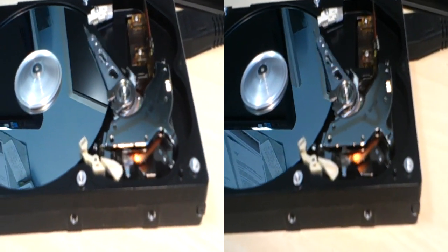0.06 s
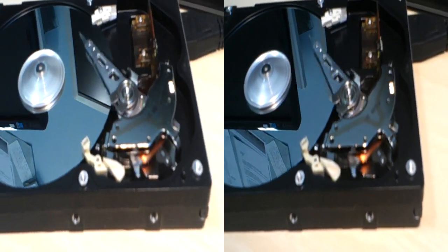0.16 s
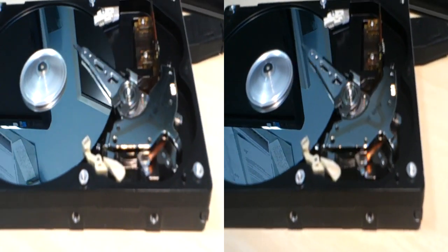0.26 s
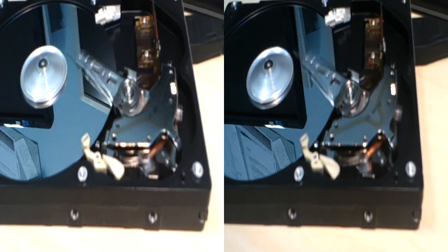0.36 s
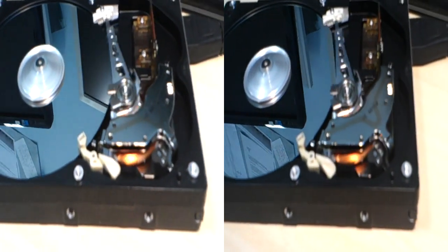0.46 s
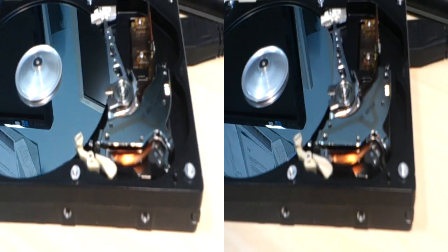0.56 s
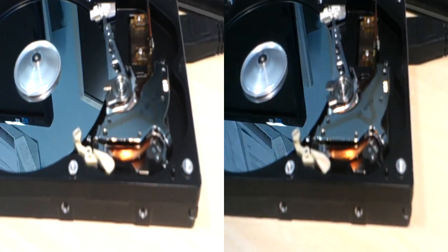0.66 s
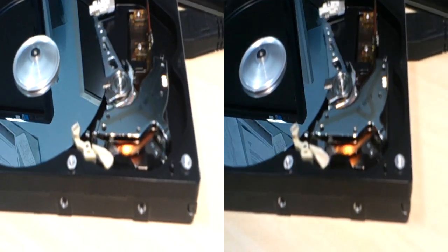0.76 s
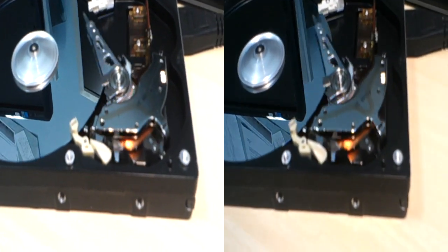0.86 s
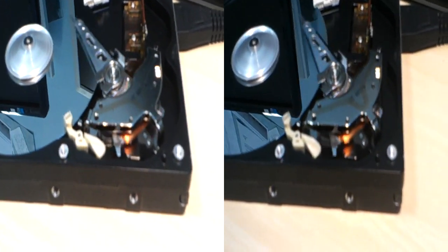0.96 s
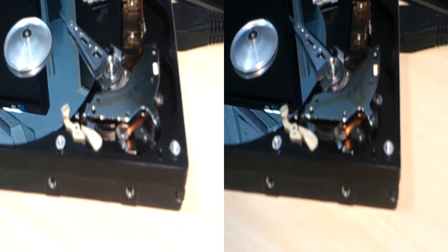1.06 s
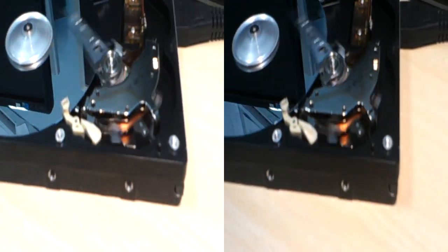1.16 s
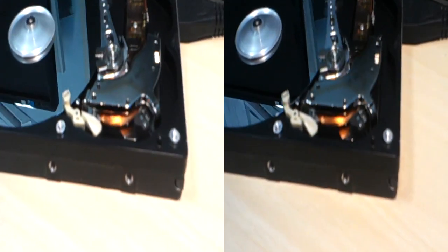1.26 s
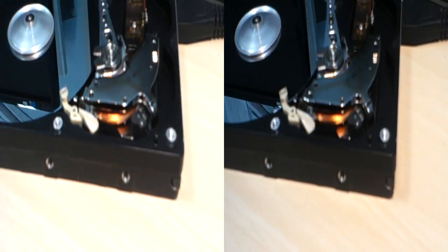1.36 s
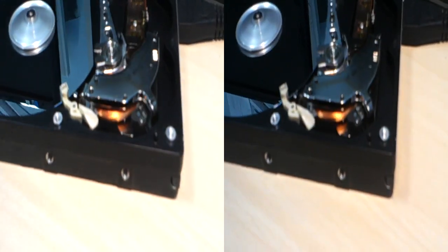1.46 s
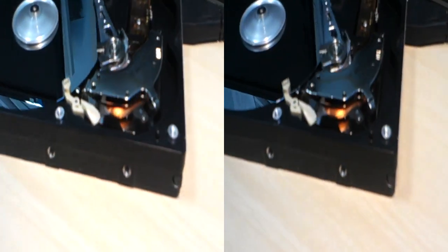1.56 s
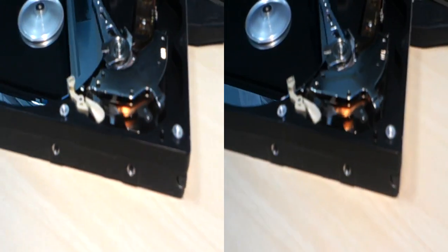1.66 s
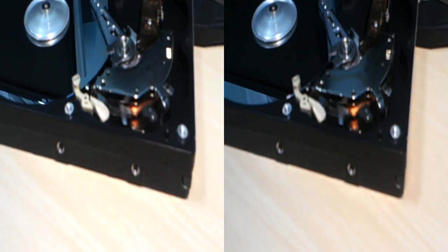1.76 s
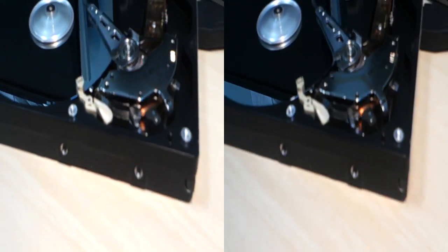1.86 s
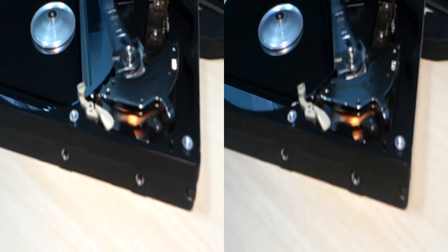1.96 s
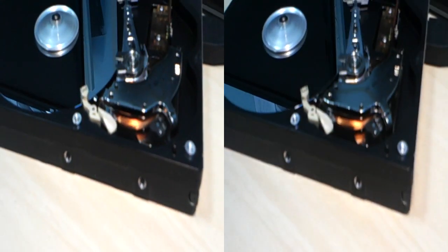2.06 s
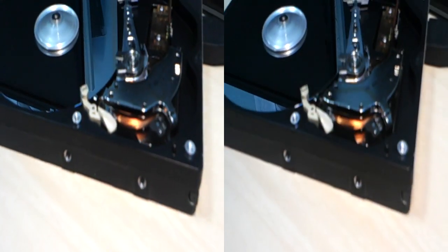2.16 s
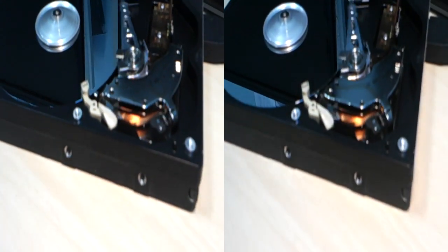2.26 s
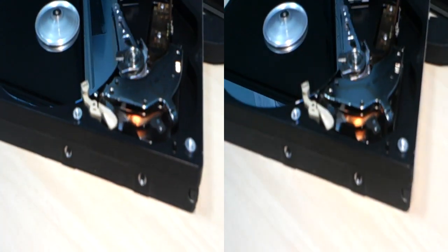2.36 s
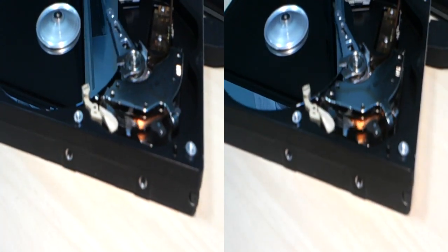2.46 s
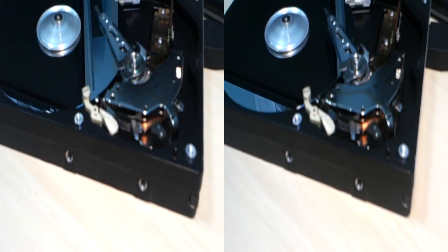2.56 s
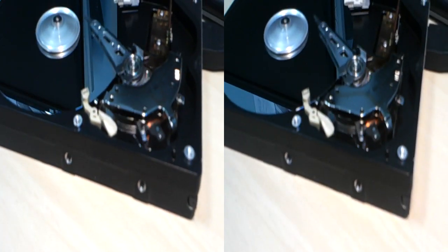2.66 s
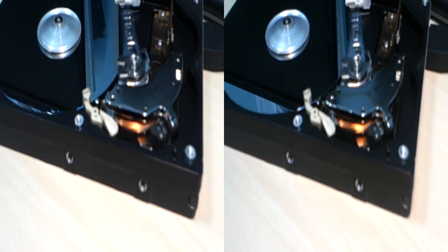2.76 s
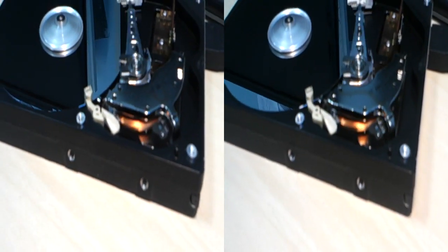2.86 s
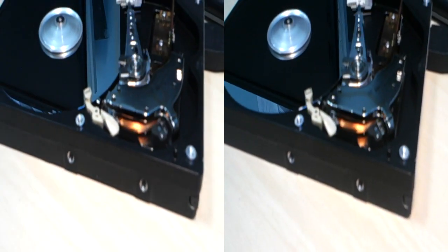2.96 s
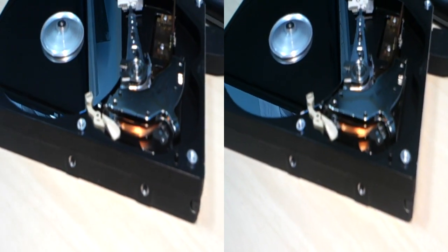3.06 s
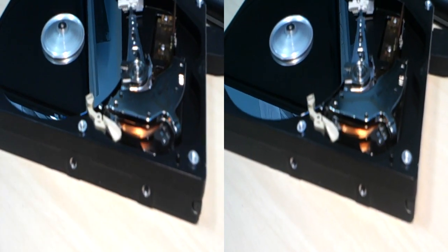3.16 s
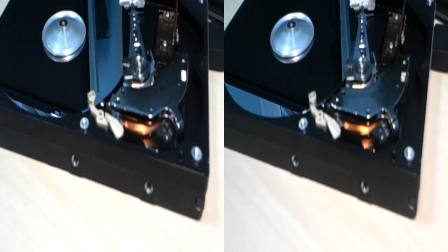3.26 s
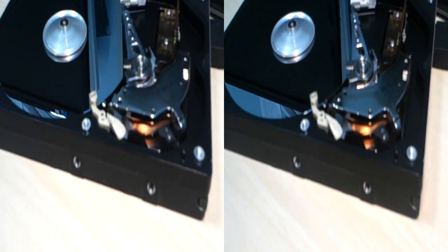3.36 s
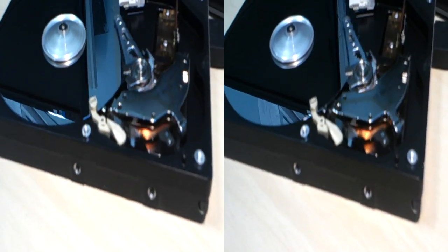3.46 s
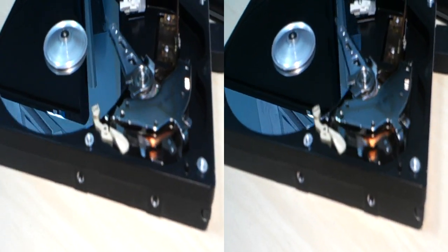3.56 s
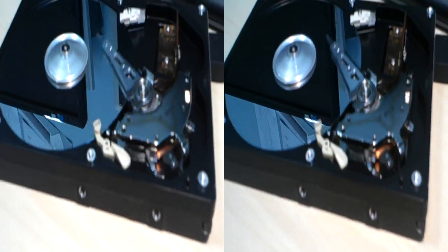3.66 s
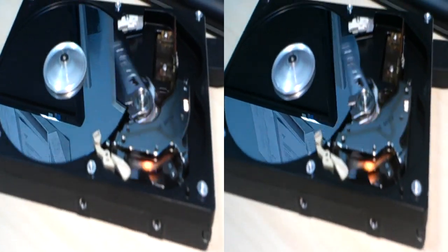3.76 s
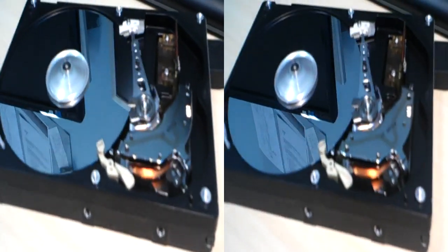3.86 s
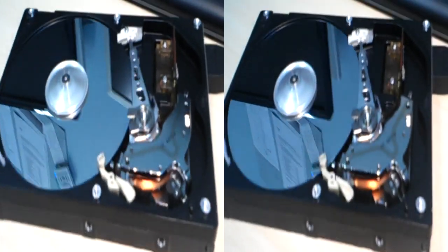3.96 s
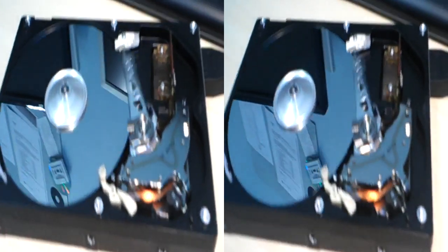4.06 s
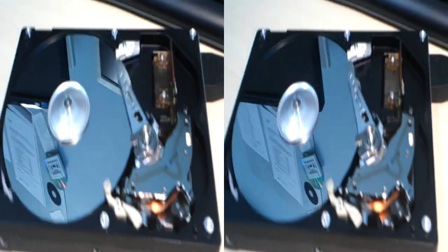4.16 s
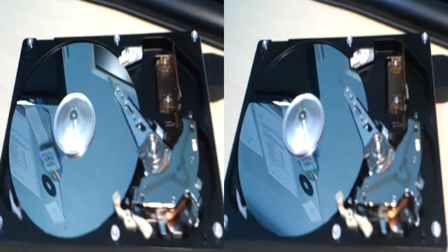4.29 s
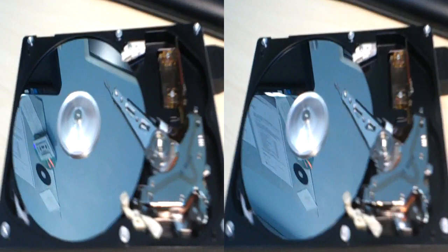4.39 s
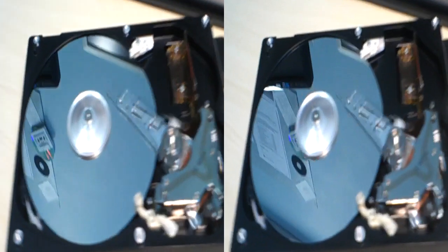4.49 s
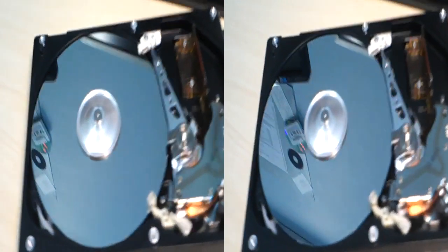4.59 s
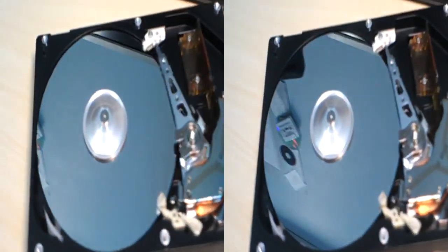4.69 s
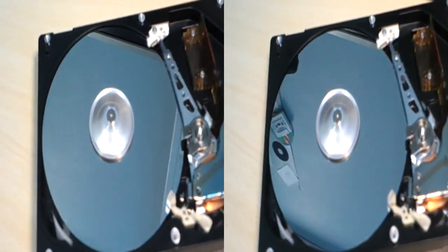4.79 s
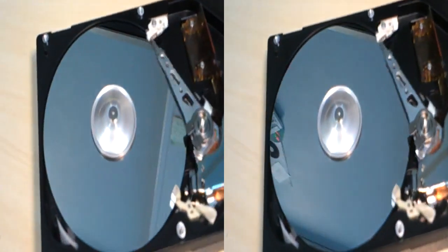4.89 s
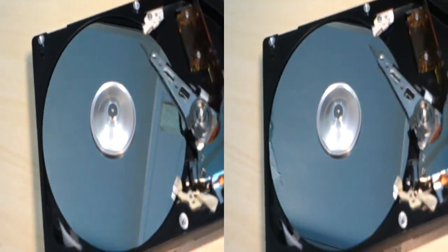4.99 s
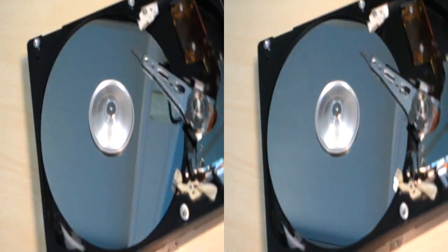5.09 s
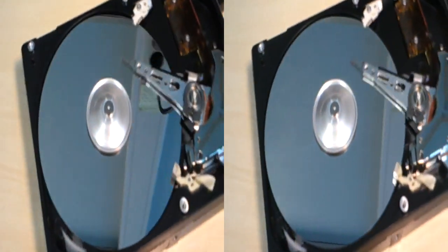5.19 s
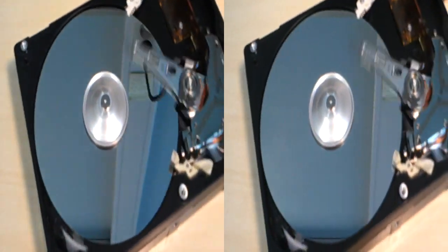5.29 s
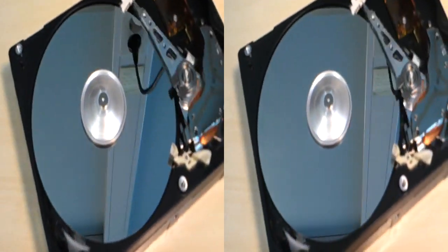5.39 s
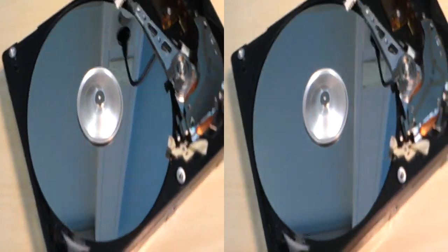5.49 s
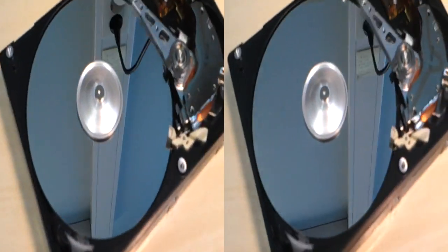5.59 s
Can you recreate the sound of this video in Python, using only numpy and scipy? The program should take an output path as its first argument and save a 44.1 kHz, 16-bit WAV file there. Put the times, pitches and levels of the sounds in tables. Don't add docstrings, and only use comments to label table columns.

```python
import sys
import numpy as np
from scipy import signal
from scipy.io import wavfile
from scipy.ndimage import uniform_filter1d

SR = 44100
rng = np.random.default_rng(int(sys.argv[2]) if len(sys.argv) > 2 else 0)


def voltage_ratio(level):
    return 10 ** (np.asarray(level, float) / 20)


def output_pcm(signal):
    pcm = np.clip(np.atleast_2d(signal).T, -1, 1) * 32767
    wavfile.write(sys.argv[1], SR, np.round(pcm).astype(np.int16))


N = 248283
T = np.arange(N) / SR

# base, frame, arm, arm tip, flexure [f/Hz]
PARTS_HZ = [1600, 2760, 3430, 3750, 6300]
FLAT_DB = np.zeros(len(PARTS_HZ))
# [inner knock t/s, lift-off lead/s (0 = bounce off the last slam), knock level/dB, slam level/dB,
# base ring in the slam/dB]
CYCLES = [
    (0.1001, .071, 1, -1.5, -3),
    (0.878, .085, 1.5, 0.5, 3),
    (1.6519, .0786, 0.5, -1, -8),
    (2.4203, .076, 0, -1, -13),
    (3.1942, .080, -1.5, -1, -18),
    (3.4582, 0, 0.5, -1, -14),
    (4.2272, .0756, 0.5, -3, -4.5),
    (5.0012, .0804, 2, -4, 5.5),
]
# [t/s, retreat 0-1, platter in view 0-1, turned away from the arm tip 0-1]
HAND = [(0, 0, 1, 0.53), (.35, 0.11, 1, 0.57), (.8, 0, 0.86, 0.25), (1.15, 0.09, 0.77, 0.46),
        (1.6, 0.28, 0.36, 0.36), (1.93, .3, .03, 0.25), (2.4, .48, .35, 0.22), (3.0, 0.4, 0.46, 0.27),
        (3.5, .45, 0.67, 0.01), (4.15, 0.47, 0.04, 0.27), (4.3, 0.63, .15, 0.7), (4.6, 0.5, 0.4, 0.53),
        (4.97, 0.63, 1, 1), (5.3, 0.7, 1, 0.83), (5.63, 0.83, 0.7, 0.5)]
BRAKE_LEAD_S = .018


def evened(x):
    return x / np.sqrt(np.mean(abs(x) ** 2) + 1e-20)


def add(mix, s, sound):
    cut = max(-round(s * SR), 0)
    part = mix[max(round(s * SR), 0):][:len(sound) - cut]
    part += sound[cut:][:len(part)]


def waver(count, width_hz):
    keep = np.exp(-np.pi * width_hz / SR)
    z = rng.standard_normal((count + 4000, 2)) @ [1, 1j]
    once = signal.lfilter([1], [1, -keep], z)
    return evened(signal.lfilter([1], [1, -keep], once)[4000:])


def curve(rows):
    s, *columns = np.transpose(rows)
    return [np.interp(T, s, c) for c in columns]


def away(s):
    times, *_, turn = np.transpose(HAND)
    return np.interp(s, times, turn)


def seen(parts_db, away_db, s):
    return np.add(parts_db, away(s) * np.array(away_db))


def placed(rows):
    moves = np.array(curve(HAND))
    return [db + np.array(per_move_db) @ moves for db, *per_move_db in rows]


def tone(hz, db, rough, width_hz, count=N):
    turn = np.exp(2j * np.pi * (np.cumsum(hz * np.ones(count)) / SR + rng.random()))
    return np.sqrt(2) * voltage_ratio(db) * (turn * (1 + rough * waver(count, width_hz))).real


def arm():
    out = np.zeros(N)
    for s, lead_s, knock_db, slam_db, base_db in CYCLES:
        lifts = lead_s > BRAKE_LEAD_S
        slam_s = s + .2432 + (0 if lifts else .0034)
        slam(out, slam_s, slam_db, base_db)
        knock(out, s, knock_db)
        rebound(out, s)
        if lifts:
            lift(out, s - lead_s)
            brake(out, s)
    return out


def slam(out, s, slam_db, base_db):
    # [f/Hz, level/dB, swell/ms, hold/ms, t60/s]
    slam_modes = [(1627, -22, 3.7, 4.7, 0.048), (1810, -31, 8.1, 13, 0.063), (2325, -19.5, 8.3, 9.1, 0.079),
                  (2436, -21.5, 6.5, 6.7, 0.013), (2774, -7, 4.6, 4.8, 0.031),
                  (3410, -11.5, 13.4, 3.7, 0.016), (3480, -11, 15.3, 3.1, 0.026), (3736, 0, 16, 2.1, 0.022),
                  (4514, -12.5, 0.9, 4.9, 0.018), (4686, -15.5, 8.3, 4, 0.028),
                  (5850, -30.5, 1, 3.8, 0.065), (6310, -23.5, 0.93, 6.4, 0.01),
                  (6860, -28.5, 7.6, 6, 0.036), (8490, -29, 2.5, 5.1, 0.021)]
    desk_modes = [(707, -37, 3.7, 3.5, 0.018), (1096, -37, 10, 5.2, 0.16)]
    after_modes = [(2314, -41, 93, 10, 0.097), (2747, -28.5, 49, 12, 0.4), (2870, -35, 18, 10, 0.46),
                   (3420, -35.5, 81, 10, 0.32), (3900, -42.5, 91, 10, 0.29), (3840, -39, 94, 7.9, 0.73),
                   (3640, -39, 130, 7.3, 0.9), (4240, -45, 90, 5, 0.49), (4560, -51, 64, 10, .2),
                   (6330, -45, 44, 10, 0.14)]
    # [centre f/Hz, level/dB, swell/ms, hold/ms, t60/s]
    slam_scrape = [(5180, -23, 1.8, 15.8, 0.04)]
    # face on [level/dB], then change when turned away [level/dB]
    face_db = [-3.5, -3, -0.5, -0.5]
    away_db = [1.7, 3.5, -14, 6.2]
    parts_db = [base_db, *(slam_db + seen(face_db, away_db, s))]
    add(out, s, blow(slam_modes, parts_db, rough=.28, width_hz=780) + scrape(slam_scrape, parts_db[-1]))
    add(out, s, blow(desk_modes, FLAT_DB, rough=0.39, width_hz=15))
    add(out, s, blow(after_modes, .6 * np.array(parts_db), rough=.82, width_hz=85, count=16000))


def knock(out, s, knock_db):
    # [f/Hz, level/dB, swell/ms, hold/ms, t60/s]
    knock_modes = [(966, -24, 6.1, 0.93, 0.1), (777, -30.5, 10.6, 1.7, 0.034),
                   (1643, -18.5, 1.1, 1.2, 0.08), (2350, -12.5, 0.27, 0.79, 0.076),
                   (3020, -13, 0.66, 1.3, 0.018), (3582, -8.5, 0.78, 1.7, 0.0079),
                   (3767, -8, 5.1, 0.27, 0.031), (4574, -10, 0.94, 0.71, 0.021),
                   (5670, -52, 0.78, 1, 0.028), (6200, -20.5, 2.3, 1.4, 0.035), (6480, -19, 1.8, 1, 0.035),
                   (8940, -18.5, 0.21, 0.34, 0.035), (10200, -47, .6, .6, .01),
                   (10930, -24, 0.35, .6, 0.011)]
    # [centre f/Hz, level/dB, swell/ms, hold/ms, t60/s]
    knock_scrape = [(5980, -11.5, 0.85, 1, 0.015)]
    # face on [level/dB], then change when turned away [level/dB]
    face_db = [-8, -9.5, -6.5, 1.8, -7]
    away_db = [-2.7, -3, 10, -19, -3.3]
    parts_db = knock_db + seen(face_db, away_db, s)
    ring = blow(knock_modes, parts_db, rough=.24, width_hz=1900)
    add(out, s - .001, ring + scrape(knock_scrape, parts_db[-1]))


def lift(out, s):
    # [f/Hz, level/dB, swell/ms, hold/ms, t60/s]
    lift_modes = [(2410, -14, 2, 2, 0.033), (2744, -10, 1.4, 2.4, 0.081), (3046, -7.5, 4.5, 2.1, 0.028),
                  (4060, 1, 2.4, 0.76, 0.018), (4760, -11, 1.8, 1.5, 0.015), (6150, -19, 2.8, 4.1, 0.07),
                  (6820, -11.5, 1.5, 2, 0.024), (8560, -17, 1.8, 0.72, 0.014)]
    # [centre f/Hz, level/dB, swell/ms, hold/ms, t60/s]
    lift_scrape = [(4640, -25, 0.98, 3.6, 0.073)]
    # face on [level/dB], then change when turned away [level/dB]
    face_db = [-19.5, -19.5, -20.5, -13, -21]
    away_db = [6, -.4, -2, -19.5, 9]
    parts_db = seen(face_db, away_db, s)
    ring = blow(lift_modes, parts_db, rough=.24, width_hz=890)
    add(out, s - .0015, ring + scrape(lift_scrape, parts_db[-1]))


def brake(out, knock_s):
    # [f/Hz, level/dB, swell/ms, hold/ms, t60/s]
    brake_modes = [(3770, -16, 5.5, 6, 0.0097), (4330, -31, 1, 3.5, 0.033), (5700, -24, 1, 2.7, 0.035),
                   (6760, -17, 1, 3.6, 0.057), (8300, -17, 1, 2.7, 0.046)]
    parts_db = [0, 0, 0, 0, -6 + 6 * away(knock_s)]
    jolt = blow(brake_modes, parts_db, rough=0.34, width_hz=270)
    add(out, knock_s - BRAKE_LEAD_S - .001, voltage_ratio(-9.5 - 6 * away(knock_s)) * jolt)


def rebound(out, knock_s):
    # [f/Hz, level/dB, swell/ms, hold/ms, t60/s]
    rebound_modes = [(2810, -10.5, 1.6, 1.1, 0.053), (3790, -6, 1.3, 1.9, 0.024),
                     (4800, -12, 1, 1.4, 0.012)]
    tap = blow(rebound_modes, FLAT_DB, rough=0.31, width_hz=270)
    add(out, knock_s + .1018 - .001, voltage_ratio(-18 - 8.5 * away(knock_s)) * tap)


def blow(modes, parts_db, rough, width_hz, count=4000):
    t, out = np.arange(count) / SR, np.zeros(count)
    steady = np.sqrt(1 - rough ** 2)
    for hz, db, swell_ms, hold_ms, t60_s in modes:
        rise = np.sin(np.pi / 2 * np.minimum(t * 1000 / swell_ms, 1)) ** 2
        fall_db = -60 * np.maximum(t - (swell_ms + hold_ms) / 1000, 0) / t60_s
        turn = np.exp(2j * np.pi * (hz * t + rng.random()))
        turn = turn * (steady + rough * waver(count, width_hz))
        out += voltage_ratio(db + np.interp(hz, PARTS_HZ, parts_db) + fall_db) * rise * turn.real
    return out


def scrape(band, db):
    edges_hz = [900, 11500]
    rasp = blow(band, [db] * len(PARTS_HZ), rough=1, width_hz=6800)
    return signal.sosfilt(signal.butter(3, edges_hz, "band", fs=SR, output="sos"), rasp)


def room(x):
    t60_s, gap_s, spacing = 0.29, 0.037, 22
    taps = np.zeros(SR // 2)
    at = np.arange(0, len(taps) - spacing, spacing)
    at = at + rng.integers(0, spacing, len(at))
    taps[at] = rng.choice([-1., 1.], len(at))
    t = np.arange(len(taps)) / SR
    taps *= voltage_ratio(-60 * t / t60_s) * (1 - np.exp(-(t / gap_s) ** 2))
    return signal.fftconvolve(x, taps / np.linalg.norm(taps))[:N]


def coil():
    coil_hz, partner_hz, width_hz = 10840, 13050, 330
    lead_s, length_s = 0.05, 0.074
    out, t, retreat = np.zeros(N), np.arange(round(length_s * SR)) / SR, curve(HAND)[0]
    for knock_s, lift_lead_s, *_ in CYCLES:
        if lift_lead_s <= BRAKE_LEAD_S:
            continue
        s = knock_s - lift_lead_s
        whine = (np.exp(2j * np.pi * coil_hz * t) * waver(len(t), width_hz)).real
        partner = (np.exp(2j * np.pi * partner_hz * t) * waver(len(t), width_hz)).real
        db = -37.5 - 19 * retreat[round(s * SR)] - 3 * away(s)
        add(out, s - lead_s, voltage_ratio(db) * (whine + voltage_ratio(-19) * partner) * signal.windows.tukey(len(t), .3))
    return out


def hand():
    # [t/s, level/dB, f/Hz]
    bumps = [
        (5.255, -42, 430),
        (5.282, -39, 440),
        (5.31, -40, 410),
        (5.345, -43, 440),
        (5.40, -45, 470),
    ]
    out = np.zeros(N)
    for s, db, hz in bumps:
        add(out, s, blow([(hz, db, 8, 4, .06)], FLAT_DB, rough=0.74, width_hz=440))
    return out


def air():
    # [f/Hz, level per Hz/dB]
    spectrum = [(12, -36), (20, -8.5), (185, -1), (257, -13.5), (294, -4), (346, -13.5), (430, -14),
                (682, -13), (1110, -15.5), (2130, -4.5), (2720, -11), (3040, -2.5), (5220, -15.5),
                (8520, -8.5), (13200, -33.5)]
    # [f/Hz, width/Hz, level/dB]
    resonances = [(650, 20, 2.4), (2015, 440, 9.75), (2956, 190, 4.5), (4600, 820, 8.4), (6600, 660, 0.48),
                  (7980, 360, 4.7), (11280, 2000, 8.9)]
    edges_hz = [0, 260, 1400, 5200, 7450, 9000, 22050]
    # [rest level/dB, per retreat/dB, per platter view/dB, per turn away/dB]
    band_levels = [(-42.5, -8, -0.7, 1.35), (-34, -1.5, 0.4, 0.3), (-43.5, -0.4, 6, -0.1),
                   (-43.5, -6.5, -2.4, 9)]
    rumble_db, top_db = -54.5, -49
    size, hop = 1024, 256
    frames, hz = N // hop + 5, np.fft.rfftfreq(size, 1 / SR)
    a, b, patches, strands = rng.standard_normal((frames, len(hz), 4)).T
    strands = evened(uniform_filter1d(uniform_filter1d(strands, size=3, axis=0), size=50, axis=1))
    patches = evened(uniform_filter1d(uniform_filter1d(patches, size=12, axis=0), size=14, axis=1))
    f, db = np.transpose(spectrum)
    shape_db = np.interp(np.log(hz + 1), np.log(f + 1), db)
    for peak_hz, width_hz, peak_db in resonances:
        shape_db += peak_db / (1 + (2 * (hz - peak_hz) / width_hz) ** 2)
    frame_s = np.arange(frames) * hop / SR
    drifting_db = [np.interp(frame_s, T, c) for c in placed(band_levels)]
    bands_db = np.array([np.full(frames, rumble_db), *drifting_db, np.full(frames, top_db)])
    band = np.clip(np.searchsorted(edges_hz, hz) - 1, 0, len(bands_db) - 1)
    power = np.bincount(band, voltage_ratio(shape_db) ** 2)
    gain_db = (bands_db - 10 * np.log10(power)[:, None])[band]
    gain_db = uniform_filter1d(gain_db, size=5, axis=0)
    z = (a + 1j * b) * voltage_ratio(shape_db[:, None] + gain_db + 1.4 * patches + 1.29 * strands)
    return signal.istft(z, nperseg=size, noverlap=size - hop)[1][:N]


def motor():
    multiples = (1.99, 10, 11, 12)
    # [rest level/dB, per retreat/dB, per platter view/dB, per turn away/dB]
    line_levels = [(-42, -34, 0, -14), (-55.5, 0, 0, 0), (-61, -6, 7, 3), (-54.5, -3, 0, -4)]
    base_hz = 720.8 * (1 + .0007 * waver(N, width_hz=3.13).real)
    return sum(tone(base_hz * k, db, rough=.5, width_hz=18) for k, db in zip(multiples, placed(line_levels)))


def fans():
    # [t/s, length/s, f/Hz, glide/(Hz/s), level/dB]
    swells = [(0.02, .62, 294.3, 0.7, -48), (0.481, 0.714, 295.8, -1.9, -45), (1.406, 0.34, 301, 2, -55.5),
              (1.999, 0.39, 293.5, 1, -48.5), (2.424, 0.44, 291.7, 0, -50), (2.897, .5, 289, 4, -61),
              (4.794, .75, 294.5, -3.5, -55), (0, 0.21, 321, 6, -53.5), (0.471, 1.03, 318.5, 0, -52.5),
              (1.555, 1.15, 312.3, -3.5, -55.5), (2.903, 0.79, 310.4, -0.3, -54.5),
              (3.549, 0.92, 307.8, -9.5, -53), (5.002, 0.94, 320, -4.5, -60)]
    out = np.zeros(N)
    for s, length_s, hz, glide, db in swells:
        t = np.arange(round(length_s * SR)) / SR
        line = tone(hz + glide * t, db, rough=0.19, width_hz=4.5, count=len(t))
        add(out, s, line * signal.windows.tukey(len(t), 0.39))
    return out


def hum():
    # [f/Hz, level/dB]
    lines = [(39.5, -59.5), (59, -66.5), (693, -62.5), (28.6, -66)]
    change_db = -8 * (curve(HAND)[0] - .5)
    return sum(tone(hz, db + change_db, rough=0.63, width_hz=8.4) for hz, db in lines)


def scene():
    blows = arm()
    machine = blows + voltage_ratio(-16.5) * room(blows) + coil() + hand() + air() + motor()
    return (machine + fans() + hum())[None]


def band_limit(x):
    return signal.sosfilt(signal.butter(12, 15840, fs=SR, output="sos"), x)


def record(dry):
    top, knee = .735, 30
    treble_edge = signal.ellip(8, .3, 70, 12950, fs=SR, output="sos")
    heard = signal.sosfilt(treble_edge, dry)
    clipped = heard / (1 + abs(heard / top) ** knee) ** (1 / knee)
    hz, db = [0, 13200, 13500, 15650, 15950, SR / 2], [0, 0, -9, -9, -90, -90]
    dulled = signal.oaconvolve(clipped, signal.firwin2(255, hz, voltage_ratio(db), fs=SR)[None], "same")
    return band_limit(dulled)


dry = scene()
out = record(dry)
output_pcm(out)
```